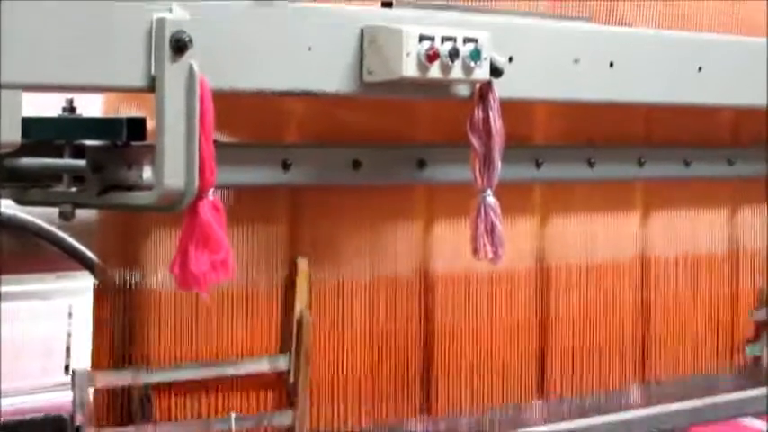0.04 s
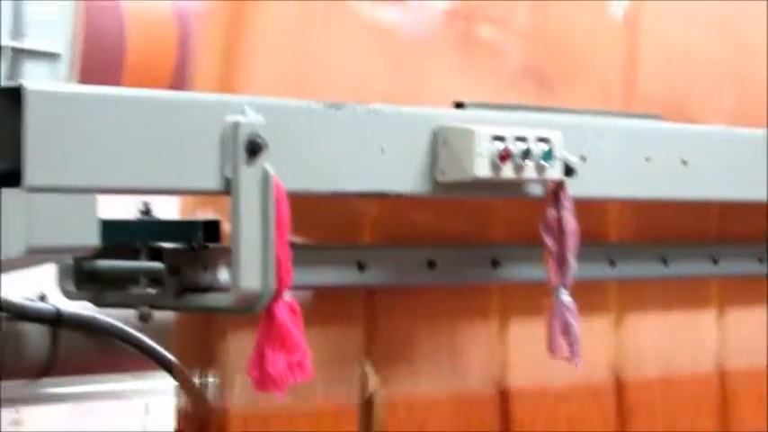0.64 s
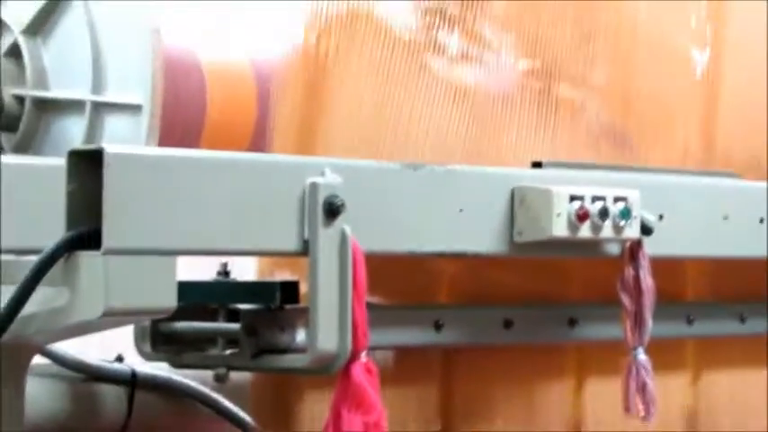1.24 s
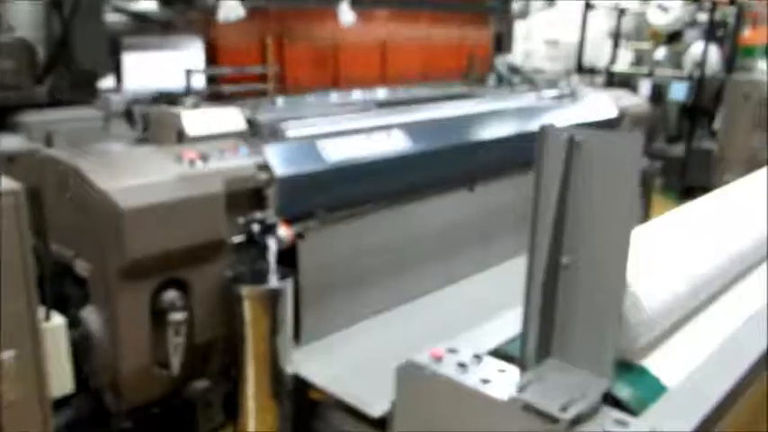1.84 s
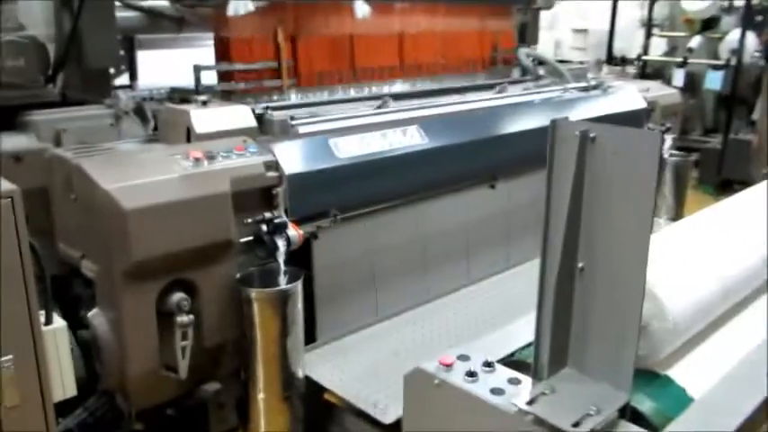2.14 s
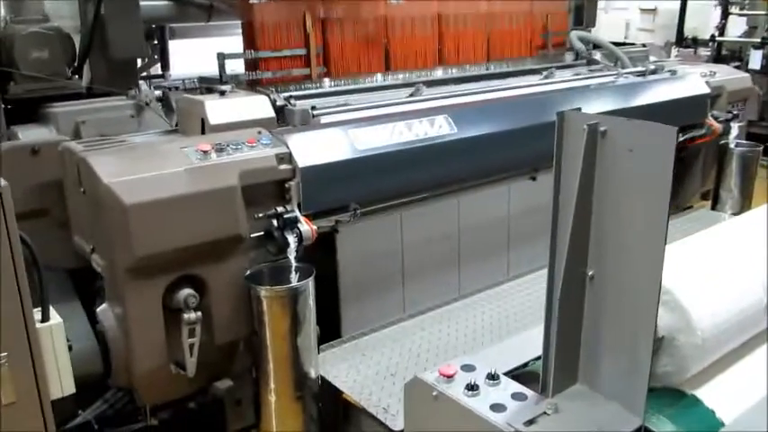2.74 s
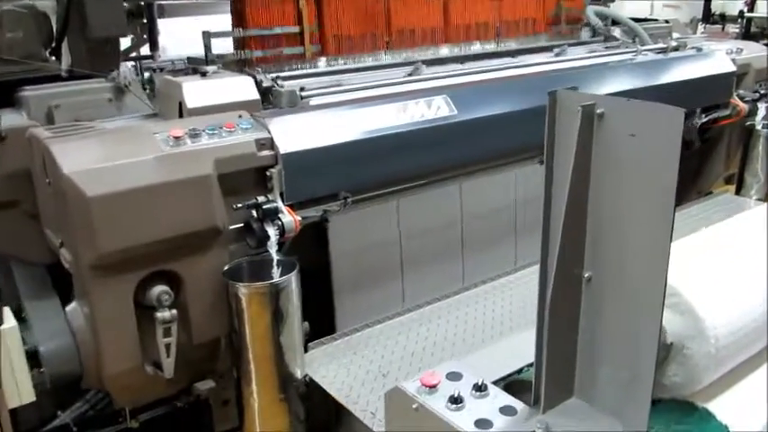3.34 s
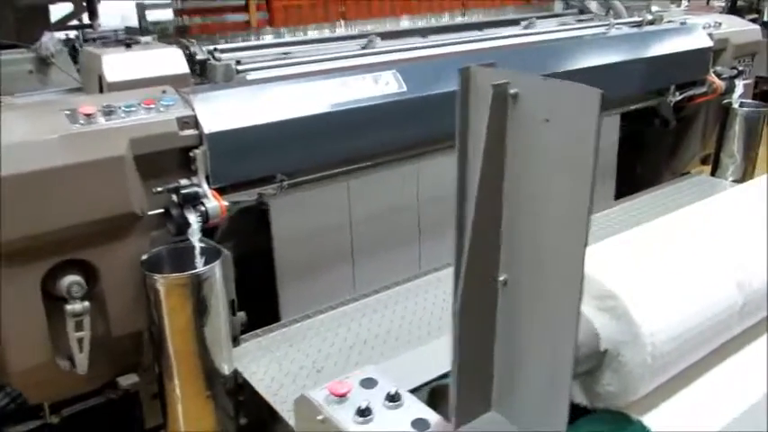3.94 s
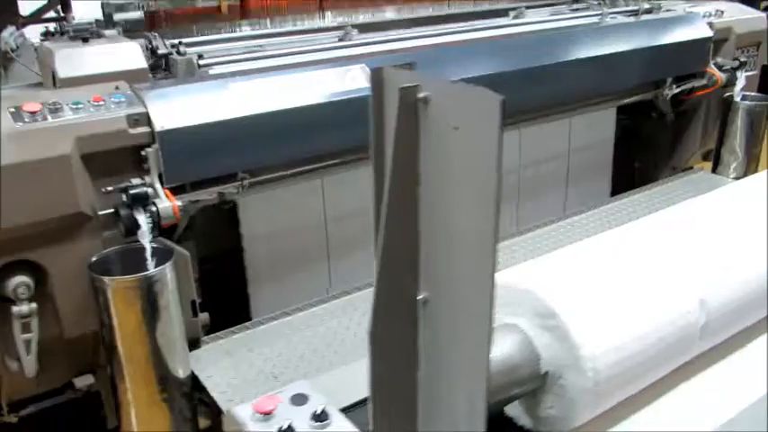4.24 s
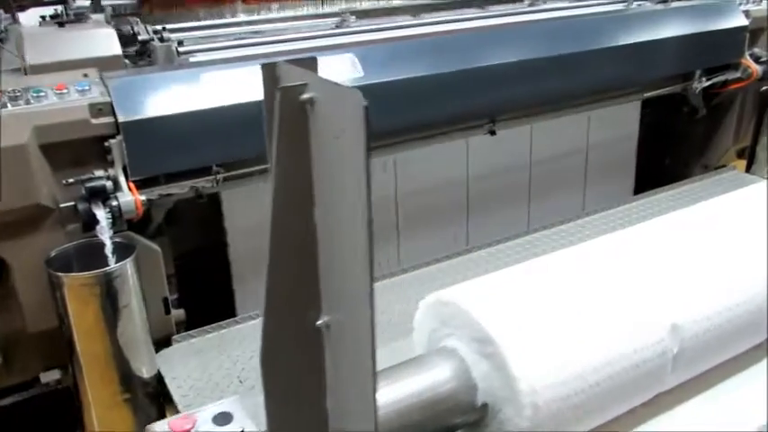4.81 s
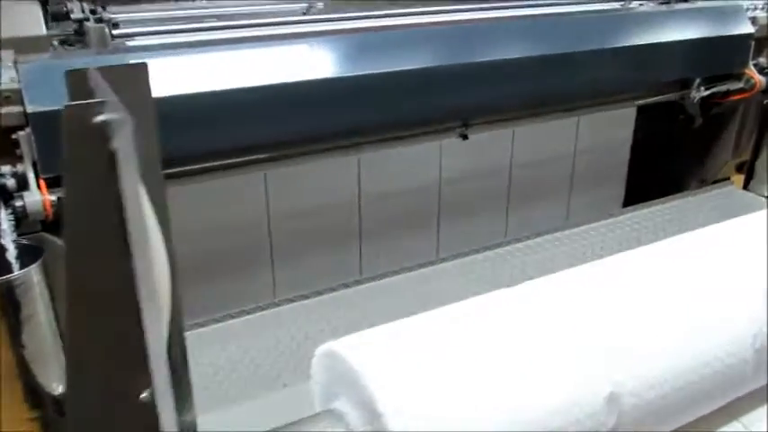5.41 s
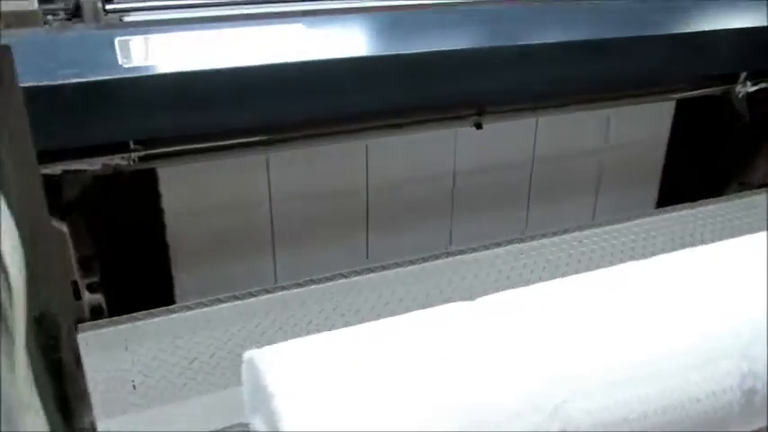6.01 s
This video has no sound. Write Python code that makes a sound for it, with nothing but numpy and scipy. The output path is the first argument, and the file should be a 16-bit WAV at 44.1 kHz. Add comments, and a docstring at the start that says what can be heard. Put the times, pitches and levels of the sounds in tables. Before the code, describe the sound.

A large weaving loom runs close by in a factory hall, with rapid regular spurts of hissing water and knocking over the dense roar of other machines. Steel parts snap, panels thump and a thin squeak comes back now and then. After about a second and a half the sound cuts out for a moment, then returns brighter from the front of the loom, with more snaps and some clacking covers.

```python
"""A water-jet loom weaves in a hall full of other looms, shooting about 217 threads (picks) a minute.
Every pick brings the same round of spray bursts and frame knocks. Steel parts snap, panels thump,
covers clack, and about every third pick a dry guide squeaks. A drive whines, and the other looms
roar and hiss underneath. We listen first from behind the warp (the lengthwise threads) and then,
after a short silence, from the front."""
import sys
import numpy as np
from scipy import signal
from scipy.fft import rfft, irfft
from scipy.io import wavfile

SR = 44100
rng = np.random.default_rng(int(sys.argv[2]) if len(sys.argv) > 2 else 0)


def to_wav(s):
    """Save 16-bit WAV."""
    ch = np.atleast_2d(s).T  # columns
    pcm = np.round(np.clip(ch, -1, 1) * 32767)  # PCM
    wavfile.write(sys.argv[1], SR, pcm.astype(np.int16))


N = 267687
TIME = np.arange(N) / SR
FREQ = np.maximum(np.fft.rfftfreq(N, 1 / SR), 1)

PICK_S = .2762
REPEAT_S = 3 * PICK_S  # the weave pattern repeats after three picks
BEHIND_END_S, FRONT_START_S = 1.522, 1.7225  # silence lies between these
BEHIND_BEAT_S, FRONT_BEAT_S = .1, 2.2924  # a weave repeat starts at each of these
IS_BEHIND = TIME < BEHIND_END_S


def undb(db):
    """Turn decibels into a gain to multiply by."""
    return 10 ** (np.asarray(db) / 20)


def unit(x):
    """Scale a signal to an average strength (rms) of 1."""
    return x / np.sqrt(np.mean(x ** 2))


def curves(rows):
    """Join each column of a table with straight lines over time."""
    times, *columns = np.transpose(rows)
    return [np.interp(TIME, times, column) for column in columns]


def colour(points):
    """A gain for every frequency, drawn through (f/Hz, level/dB) points."""
    hz, db = np.transpose(points)
    return undb(np.interp(np.log(FREQ), np.log(hz), db))


def resonance(hz, width_hz):
    """A filter that passes one band, with gain 1 at its centre."""
    return 1 / (1 + 1j * (FREQ ** 2 - hz ** 2) / (FREQ * width_hz))


def shape(x, response):
    """Filter a signal with a gain for every frequency."""
    return irfft(rfft(x) * response, N)


# How wide noise sounds, as side level minus middle level: f/Hz, level/dB
STEREO_WIDTH = [(60, -15), (110, -16), (200, -13.5), (380, -7.5), (700, -11), (1290, -9), (2380, -6),
                (4400, -8), (8120, -1), (15000, 1.5)]
def spread(mid, side, response):
    """Filter two unrelated noises into a stereo sound that widens towards the treble."""
    mid, side = shape(mid, response), shape(side, response * colour(STEREO_WIDTH))
    return np.array([mid + side, mid - side]) / np.std(mid)


def grains(grain_db):
    """Two gritty noises: dense tiny impacts of uneven size."""
    size = np.repeat(undb(grain_db * rng.standard_normal(N // 16 + 1)), 16)[:N]
    return unit(rng.standard_normal((2, N)) * size)


def drift(rate_hz):
    """A smooth random wobble of about 1 either way."""
    return unit(shape(rng.standard_normal(N), 1 / (1 + (FREQ / rate_hz) ** 4)))


def burst(start, rise, decay):
    """A loudness outline that climbs and then dies away; all times in seconds."""
    age = TIME - start
    return np.clip(age / rise, 0, 1) * np.exp(-np.clip((age - rise) / decay, 0, 20))


def strikes(per_second, decay_s, scatter_db):
    """A loudness outline of small random hits, each starting suddenly and fading fast."""
    hits = rng.random(N) < per_second / SR
    energy = hits * undb(scatter_db * rng.standard_normal(N)) ** 2
    fading = signal.lfilter([1], [1, -np.exp(-2 / (decay_s * SR))], energy + 1e-18)
    return unit(np.sqrt(fading))


def add(out, t, sound):
    """Mix a sound in at t seconds."""
    start = max(int(t * SR), 0)
    out[start:start + len(sound)] += sound


def pick_times(delay):
    """The moments that lie `delay` seconds into each pick."""
    offsets = delay + PICK_S * np.arange(-3, 15)
    behind, front = BEHIND_BEAT_S + offsets, FRONT_BEAT_S + offsets
    return np.concatenate([behind[(behind > -.1) & (behind < BEHIND_END_S)],
                           front[(front > FRONT_START_S) & (front < 6.2)]])


def swing(period, depth_db, crest_s):
    """A level in dB that rises and falls in step with the loom."""
    beat = np.where(IS_BEHIND, BEHIND_BEAT_S, FRONT_BEAT_S)
    return depth_db * np.cos(2 * np.pi * (TIME - beat - crest_s) / period)


def echoes(x, fade_60db_s=0.63, echo_db=-4):
    """Hard walls and machines throw a sound back as a blurred tail."""
    tails = rng.standard_normal((2, SR)) * undb(-60 * TIME[:SR] / fade_60db_s)
    tails = tails + 2 * tails.mean(0)  # partly alike in both ears
    tails /= np.linalg.norm(tails, axis=1, keepdims=True)
    return x + undb(echo_db) * signal.fftconvolve(x[None], tails, axes=1)[:, :N]


# The tones of the frame and its covers: f/Hz, level/dB, time to fade by 60 dB/s
FRAME_TONES = [(175, -8.5, 0.06), (209.6, 2, 0.11), (263, 5.5, 0.12), (357.4, -3, 0.15), (506, -3.5, 0.044),
               (790.6, 2, 0.11), (969, 3.5, 0.057), (1209, 6.5, 0.047), (1499, 4.5, 0.04), (1711, -5, 0.25),
               (2744, -10.5, 0.19)]
def frame_ring(contact_s=.0015, detune=.045):
    """One blow on the frame: its tones swell and fade, put a little out of tune by loose parts."""
    hz, db, fade_60db_s = np.transpose(FRAME_TONES)[:, :, None]
    age = TIME[:SR // 6]
    fades = undb(db - 60 * age / fade_60db_s) * (1 - np.exp(-age / contact_s))
    pitch = hz * (1 + detune * rng.standard_normal(hz.shape))
    turns = pitch * age + rng.random(hz.shape)
    return np.sum(fades * np.sin(2 * np.pi * turns), axis=0)


# The knocks within one pick: t/s, level/dB
PICK_KNOCKS = [(.014, -1.5), (0.059, -3), (.105, -2), (.130, -3), (.174, -4), (.200, -1.5), (.222, -6),
               (.257, -3)]
def frame_knocks(jitter_s=.003):
    """The reed (a comb), cams and thread-lifting frames knock in every pick, slightly off the beat."""
    out = np.zeros(N + SR)
    for delay, db in PICK_KNOCKS:
        for t in pick_times(delay):
            add(out, t + jitter_s * rng.standard_normal(), undb(db) * frame_ring())
    return echoes(out[:N])


# The tone of the hall from behind the loom and from the front: f/Hz, level/dB
HALL_BEHIND = [(25, -31), (45, -27), (65, -18), (105, -3.5), (140, -7), (200, 0), (260, 0.5), (330, 0),
               (440, -3.5), (600, -7.5), (1200, -10), (1900, -17), (2900, -19.5), (3600, -30), (4700, -53)]
HALL_FRONT = [(25, -35), (45, -26), (66, -18), (100, -11.5), (140, -11), (190, -3.5), (265, -4),
              (330, -2.5), (400, -3), (560, -4.5), (830, -4.5), (1450, -8), (1730, -11), (1930, -14.5),
              (2250, -14), (2500, -18), (3500, -20.5), (4700, -45)]
# Narrow bands that the loom's body lifts or lowers: f/Hz, width/Hz, level/dB
BODY_BANDS = [(262, 35, -3), (810, 90, -0.5), (1015, 40, 0), (1480, 45, 0.5), (1636, 39, -0.5),
              (2686, 58, 4.5)]
# How loud the din is over time: t/s, rumble level/dB, roar level/dB
DIN_LEVELS = [(0, -23.5, -19), (1.5, -23, -19.5), (1.74, -19.5, -15.5), (1.87, -22.5, -19),
              (3.2, -23, -18.5), (3.65, -24.5, -20.5), (4.1, -22.5, -19), (4.35, -25, -21.5),
              (5.0, -21.5, -20), (5.35, -24.5, -20), (5.6, -23.5, -20), (6.05, -24.7, -21)]
def hall_din(split_hz=450, knock_db=-7.3):
    """Near knocks and countless blows of other looms merge into a low rumble and a higher roar."""
    low_band = 1 / np.sqrt(1 + (FREQ / split_hz) ** 12)
    high_band = np.sqrt(1 - low_band ** 2)
    rumble_db, roar_db = curves(DIN_LEVELS)
    rumble_db += swing(PICK_S, depth_db=.19, crest_s=.12)
    roar_db += swing(PICK_S, depth_db=.47, crest_s=.22) + swing(REPEAT_S, depth_db=.2, crest_s=.17)
    body = undb(sum(db * np.abs(resonance(hz, width)) ** 2 for hz, width, db in BODY_BANDS))
    knocks, out = frame_knocks(), 0
    for band, db in ((low_band, rumble_db), (high_band, roar_db)):
        behind = spread(*rng.standard_normal((2, N)), colour(HALL_BEHIND) * body * band)
        front = spread(*rng.standard_normal((2, N)), colour(HALL_FRONT) * body * band)
        near = undb(knock_db) * unit(shape(knocks, band))
        out += unit(np.where(IS_BEHIND, behind, front) + near) * undb(db)
    return out


# How loud the far spray is over time: t/s, level/dB
HISS_LEVELS = [(0, -28.5), (1.5, -29), (1.75, -25.5), (2.1, -29), (3.3, -30), (4.4, -31.3), (6.05, -32)]
# The tone of the far spray: f/Hz, level/dB
HISS_TONE = [(2500, -0.5), (3500, 3), (5200, 3), (7000, 1.5), (8500, -2), (13400, -4), (14600, -27)]
def far_hiss(flicker_db=1.0):
    """Distant spray blurs into a fine, flickering hiss that swells with each weave repeat."""
    surge_db = swing(REPEAT_S, depth_db=.98, crest_s=.11)
    db = curves(HISS_LEVELS)[0] + surge_db + flicker_db * drift(21)
    return spread(*grains(grain_db=-0.5), colour(HISS_TONE)) * undb(db)


def cover_ripple(depth_db=1.4):
    """Echoes off nearby covers, 1 to 6 ms late, lift some frequencies and lower others."""
    reflections = rng.standard_normal(N) * ((TIME > .001) & (TIME < .006))
    return undb(depth_db * unit(rfft(reflections).real))


# The tone of the near spray: f/Hz, level/dB
SPRAY_TONE = [(700, -12.5), (2000, 2.5), (3500, 4.5), (5000, 4), (6800, 4), (8500, 2.5), (13500, 0.7),
              (14600, -24)]
# The four bursts in a pick: t/s, rise/s, decay/s, level of an added harsh band/dB, right ear lag/s
SPRAY_BURSTS = [(.008, 0.0012, 0.043, -15, .00006), (0.041, 0.016, 0.03, -13, -.00001),
                (0.15, .016, .040, 5, .00005), (0.178, 0.0016, 0.029, -22, .00002)]
# How loud those bursts are over time: t/s, then level/dB for each of the four
SPRAY_LEVELS = [(0, -26, -34, -39, -26), (1.499, -27.5, -28, -35, -31.5), (1.749, -24.5, -25.5, -31, -22),
                (3.0, -25.5, -20, -23, -25.5), (3.7, -24, -27, -30.5, -24.5),
                (4.4, -25.5, -21.5, -31.5, -23), (6.05, -25.5, -22.5, -33, -22.5)]
def water_spray(harsh_hz=2400, harsh_width_hz=1800, scatter_db=.6, jitter_s=.001):
    """Water is shot across the threads and shaken off the reed in sputtering bursts of droplets."""
    harsh_band = np.abs(resonance(harsh_hz, harsh_width_hz))
    out = 0
    for (delay, rise, decay, harsh_db, lag), db in zip(SPRAY_BURSTS, curves(SPRAY_LEVELS)):
        times = pick_times(delay)
        chance = rng.standard_normal((len(times), 2))
        flow = sum(undb(scatter_db * louder) * burst(t + jitter_s * later, rise, decay)
                   for t, (louder, later) in zip(times, chance))
        tone = (colour(SPRAY_TONE) + undb(harsh_db) * harsh_band) * cover_ripple()
        left, right = spread(*grains(grain_db=2.4), tone)
        right = shape(right, np.exp(-2j * np.pi * FREQ * lag))  # each burst comes from its own spot
        sputter = strikes(per_second=1000, decay_s=.008, scatter_db=3)
        out += np.array([left, right]) * flow * sputter * undb(db)
    return out


def wire_ticks(front_db=-39, behind_db=-42):
    """Loose wires and stray drops tick at random, clearest at the front."""
    ticking = strikes(per_second=90, decay_s=.009, scatter_db=2.5)
    noise = spread(*rng.standard_normal((2, N)), colour(SPRAY_TONE))
    return noise * ticking * undb(np.where(IS_BEHIND, behind_db, front_db))


def heald_rasp(db=-43, hz=2850, width_hz=600):
    """Healds, the thin steel strips that lift the threads, brush together; heard only from behind."""
    return spread(*grains(grain_db=3), resonance(hz, width_hz) ** 2) * undb(db) * IS_BEHIND


# The tone of the drive: f/Hz, level behind/dB, level in front/dB
DRIVE_TONE = [(497, -36, -40)]
def drive_whine(wander=0.0017, flutter_db=4):
    """The drive whines unsteadily; at the front the loom's body blocks some of it."""
    out = 0
    for hz, behind_db, front_db in DRIVE_TONE:
        db = np.where(IS_BEHIND, behind_db, front_db) + flutter_db * drift(16)
        pitch = hz * (1 + wander * drift(9.4))
        out += undb(db) * np.sin(2 * np.pi * np.cumsum(pitch) / SR)
    return np.sqrt(2) * out


# The low, middle and high band in which small steel parts ring: f/Hz, width/Hz
STEEL_BANDS = [(2750, 860), (6700, 3400), (12200, 4500)]
# Each snap: t/s, decay/s, low band level/dB, middle band level/dB, high band level/dB
STEEL_HITS = [(.111, 0.015, -33, -25, -30), (.662, 0.014, -38, -35, -38), (1.263, .012, -42, -36, -29),
              (1.799, .008, -40, -25, -22), (1.899, .012, -36, -24, -33), (2.074, .010, -35, -23, -31),
              (2.177, .007, -36, -26, -32), (2.232, 0.0066, -22, -24, -38), (2.302, 0.0083, -32, -25, -36),
              (2.341, .009, -40, -30, -21), (2.579, 0.0087, -38, -28, -34), (2.747, 0.015, -24, -36, -31),
              (2.891, 0.0064, -38, -30, -21), (2.904, .012, -22, -28, -38), (3.132, .008, -40, -26, -32),
              (3.18, 0.018, -36, -30, -36), (3.292, .012, -30, -27, -34), (3.727, 0.021, -24, -22, -33),
              (3.852, .016, -36, -25, -27), (4.007, 0.025, -29, -23, -28), (4.284, 0.014, -34, -27, -29),
              (4.404, .007, -33, -32, -28), (4.554, 0.012, -29, -27, -38), (4.833, 0.022, -28, -23, -32),
              (4.956, .012, -38, -29, -24), (5.108, 0.022, -31, -23, -31), (5.233, .016, -39, -40, -32),
              (5.386, .018, -32, -23, -36), (5.66, .018, -37, -27.5, -33), (5.786, .016, -38, -33, -30),
              (5.937, 0.016, -35, -23, -29)]
def steel_snaps(rise_s=.001):
    """Small steel parts snap together, each hit with its own length and mix of three bands."""
    out = 0
    for band, (hz, width) in enumerate(STEEL_BANDS):
        hits = sum(undb(levels[band]) * burst(t, rise_s, decay) for t, decay, *levels in STEEL_HITS)
        out += spread(*grains(grain_db=1.5), resonance(hz, width) ** 2) * hits
    return out


# Each low thump on a panel: t/s, f/Hz, decay/s, level/dB
PANEL_HITS = [(0.124, 260, 0.032, -32), (.32, 360, .035, -28), (0.455, 261, .03, -32),
              (.642, 244, .03, -24), (.69, 320, .11, -26), (.959, 281, 0.021, -22.5),
              (1.149, 259, .03, -26), (1.23, 281.5, 0.027, -23.5), (1.407, 255, 0.044, -29),
              (1.735, 414, 0.022, -23), (1.815, 239, 0.027, -28), (2.216, 242, .04, -24.5),
              (2.641, 260, 0.04, -30), (2.687, 294, .03, -35), (3.02, 275, 0.036, -26),
              (3.13, 262, .04, -35), (3.64, 241, 0.027, -32), (3.974, 262, 0.025, -28.5),
              (4.08, 259, 0.072, -29.5), (4.67, 270, 0.068, -26.5), (5.118, 264.6, 0.034, -23),
              (5.19, 370, 0.023, -24), (5.294, 229, 0.031, -28), (5.44, 258, .03, -25),
              (5.535, 357, .035, -27), (5.611, 265, 0.047, -25.5), (5.695, 267, .06, -29.5)]
def panel_thumps(swell_s=.015):
    """Heavy, cushioned blows each set one panel of the frame humming for a moment."""
    age = TIME[:SR // 2]
    out = np.zeros(N + SR)
    for t, hz, decay, db in PANEL_HITS:
        swell = (1 - np.exp(-age / swell_s)) ** 2 * np.exp(-age / decay)
        hum = np.sqrt(2) * np.sin(2 * np.pi * (hz * age + rng.random()))
        add(out, t, undb(db) * swell / swell.max() * hum)
    return out[:N]


# Each rub, timed at its middle: t/s, half length/s, squeak level/dB, scrape level/dB
GUIDE_RUBS = [(0.23, 0.04, -30.5, -46), (0.703, 0.031, -38, -27), (1.062, 0.053, -33, -32),
              (2.442, 0.066, -36.5, -24), (3.292, 0.11, -38, -31), (4.1, 0.072, -33, -27),
              (4.943, 0.079, -35, -28), (5.78, 0.24, -42, -30)]
def guide_squeaks(squeak_hz=5220, sag_hz_per_s=1500, rough_hz=270, right_lag_s=.00002):
    """A dry guide rubs: a thin, rough squeak sags in pitch over a lower scrape."""
    middles = np.array(GUIDE_RUBS)[:, 0]
    nearest_rub = np.searchsorted((middles[1:] + middles[:-1]) / 2, TIME)
    pitch = squeak_hz - sag_hz_per_s * (TIME - middles[nearest_rub])
    ear_lags = np.array([[0], [right_lag_s]])
    phase = 2 * np.pi * (np.cumsum(pitch) / SR - squeak_hz * ear_lags)
    squeak = drift(rough_hz) * np.cos(phase) + drift(rough_hz) * np.sin(phase)
    scrape = spread(*grains(grain_db=3), resonance(hz=1600, width_hz=1000) ** 2)
    out = 0
    for t, half_length, squeak_db, scrape_db in GUIDE_RUBS:
        swell = np.exp(-((TIME - t) / half_length) ** 2)
        out += (undb(squeak_db) * squeak + undb(scrape_db) * scrape) * swell
    return out


# Each clack of the covers: t/s, decay/s, level/dB
COVER_HITS = [(1.925, .019, -21), (3.115, .019, -23), (4.875, .055, -19), (5.02, 0.04, -18.5),
              (5.226, 0.011, -16.5), (5.72, 0.024, -20), (5.85, 0.023, -22)]
def cover_clacks(hz=1150, width_hz=1500, rise_s=.009):
    """Now and then a harder blow sets the steel covers clacking."""
    hits = sum(undb(db) * burst(t, rise_s, decay) for t, decay, db in COVER_HITS)
    return spread(*rng.standard_normal((2, N)), resonance(hz, width_hz) ** 2) * hits


def scene():
    """The near loom within the din of the hall."""
    ongoing = hall_din() + far_hiss() + water_spray() + wire_ticks() + heald_rasp() + drive_whine()
    return ongoing + steel_snaps() + panel_thumps() + guide_squeaks() + cover_clacks()


# How much louder the left side is than the right: f/Hz, level/dB
LEFT_LEAN = [(60, -3), (110, -1), (200, -2.5), (380, 3.5), (700, 1.5), (1290, 1.7), (2380, 1.0),
             (4400, 0.5), (8120, -0.5), (15000, -1.0)]
# Two narrow dips in the treble: f/Hz, width/Hz
TREBLE_DIPS = [(3940, 230), (7875, 240)]
def record(dry, low_hz=35, top_hz=14600):
    """Tilt the stereo balance, cut two dips, pause between the two places and trim bass and treble."""
    dips = np.prod([1 - resonance(hz, width) for hz, width in TREBLE_DIPS], axis=0)
    bass_cut = FREQ ** 2 / np.hypot(FREQ ** 2, low_hz ** 2)
    lean = np.sqrt(colour(LEFT_LEAN))
    sound = shape(dry, bass_cut * dips * np.array([lean, 1 / lean]))
    audible = 1 - burst(BEHIND_END_S, .001, np.inf) + burst(FRONT_START_S, .0005, np.inf)
    treble_cut = signal.ellip(8, .2, 80, top_hz, fs=SR, output="sos")
    return signal.sosfilt(treble_cut, sound * audible)


dry = scene()
out = record(dry)
to_wav(out)
```